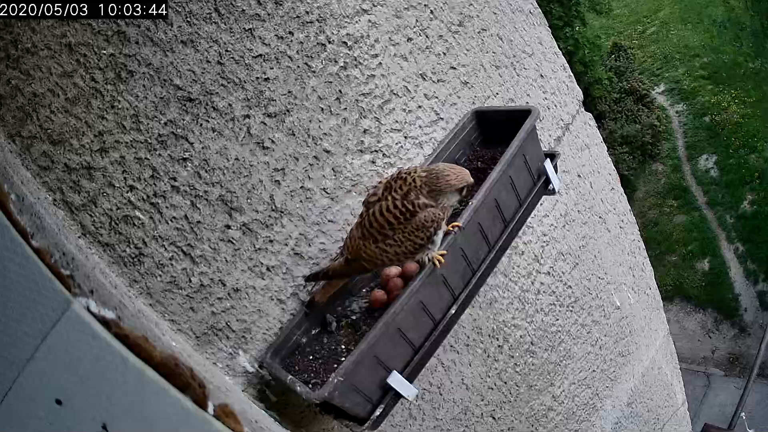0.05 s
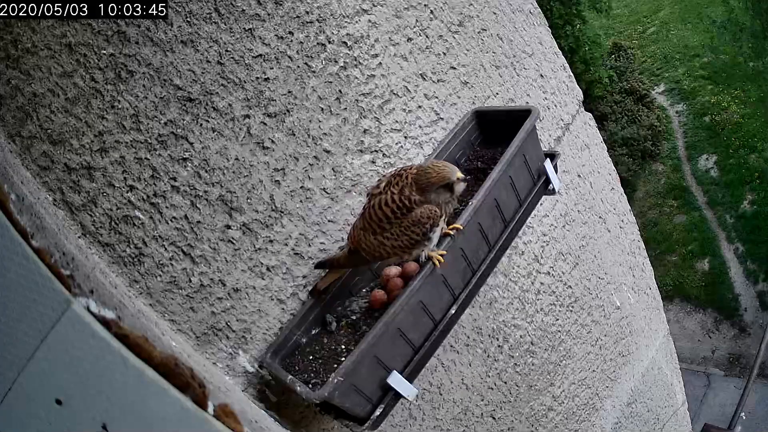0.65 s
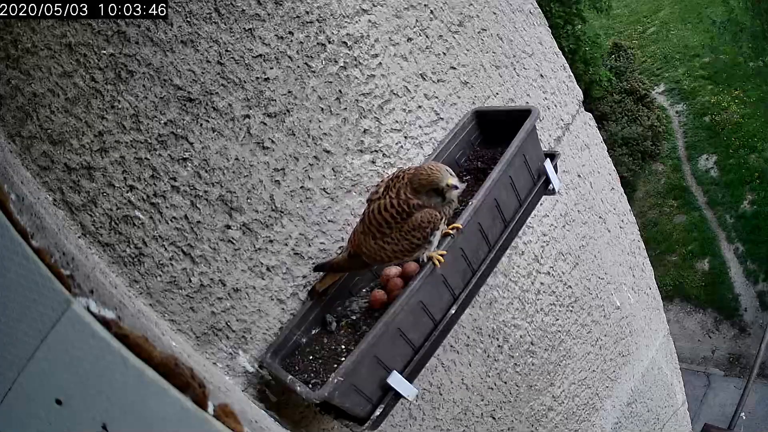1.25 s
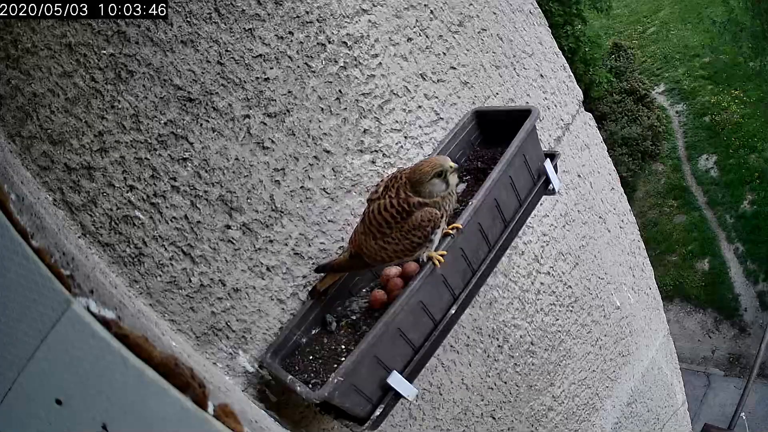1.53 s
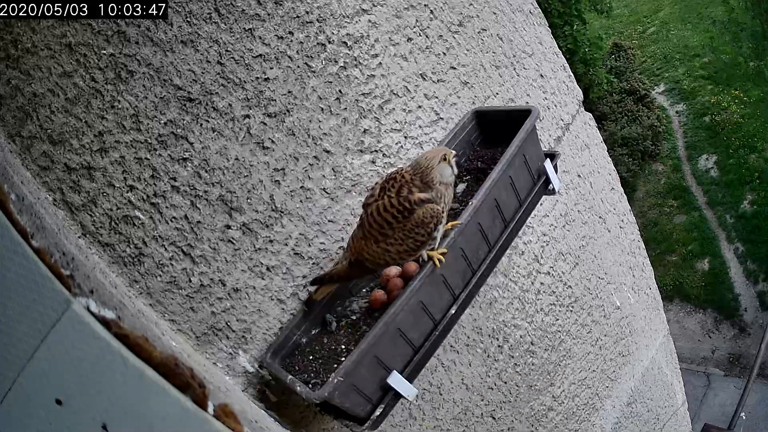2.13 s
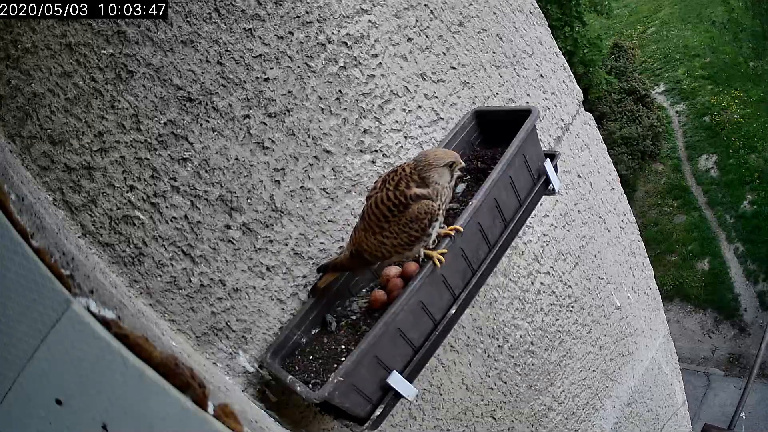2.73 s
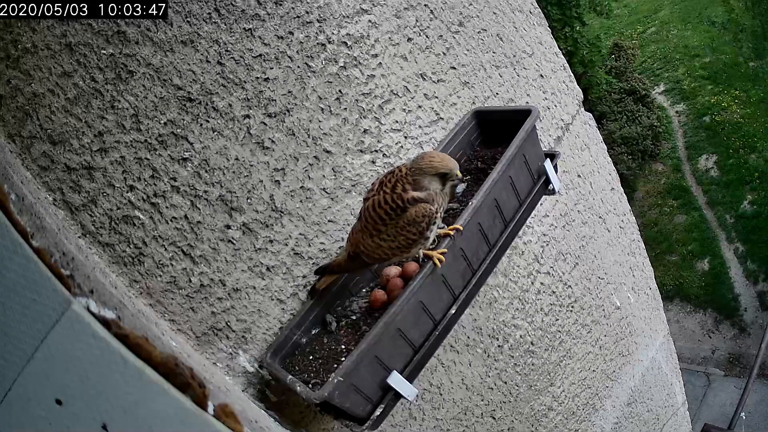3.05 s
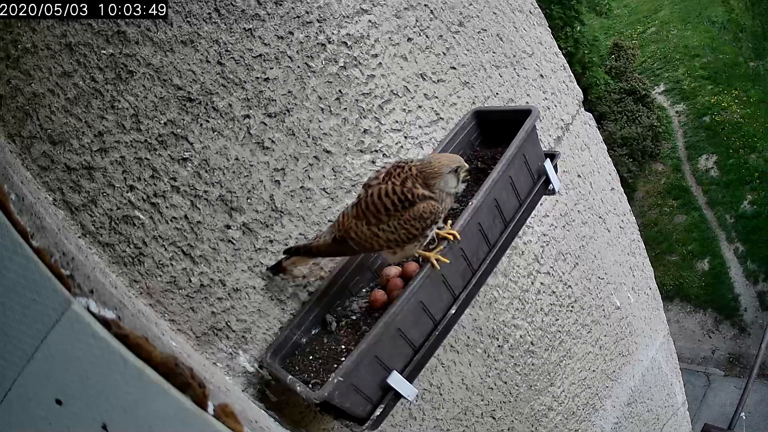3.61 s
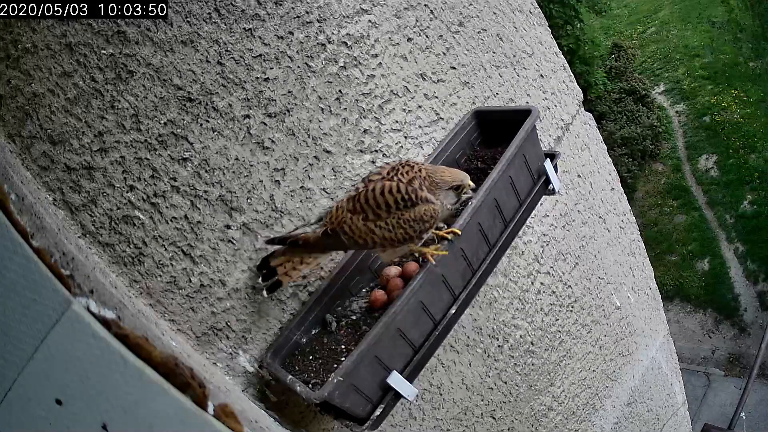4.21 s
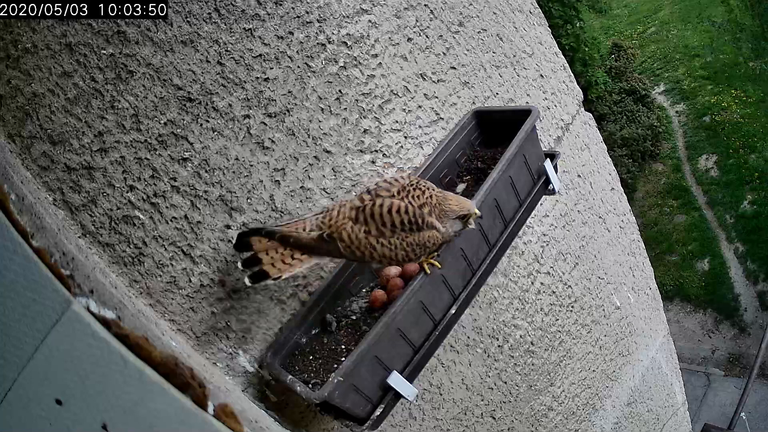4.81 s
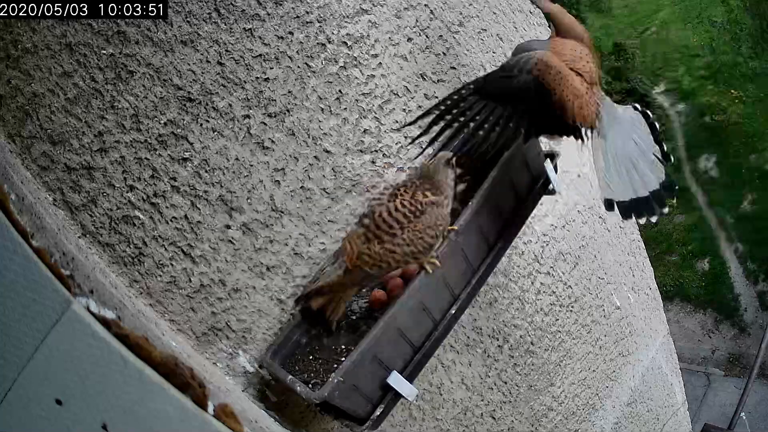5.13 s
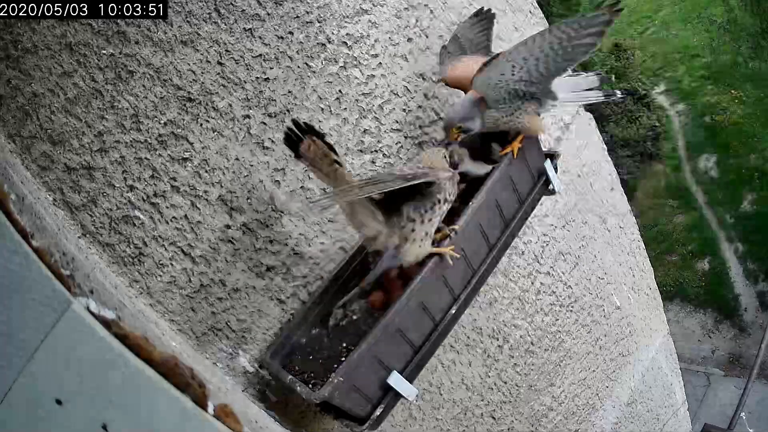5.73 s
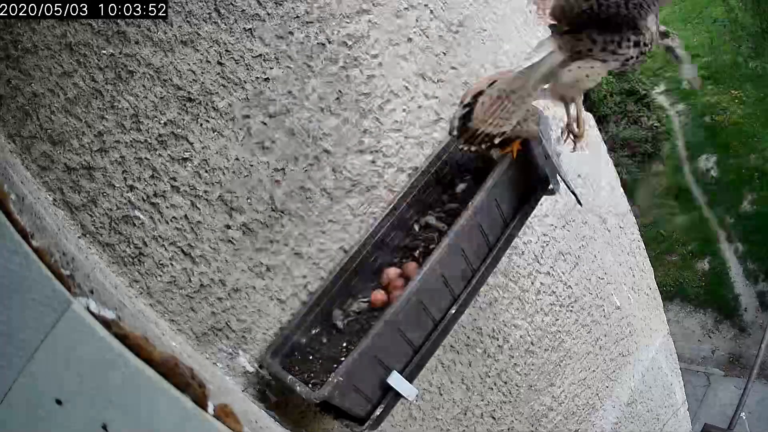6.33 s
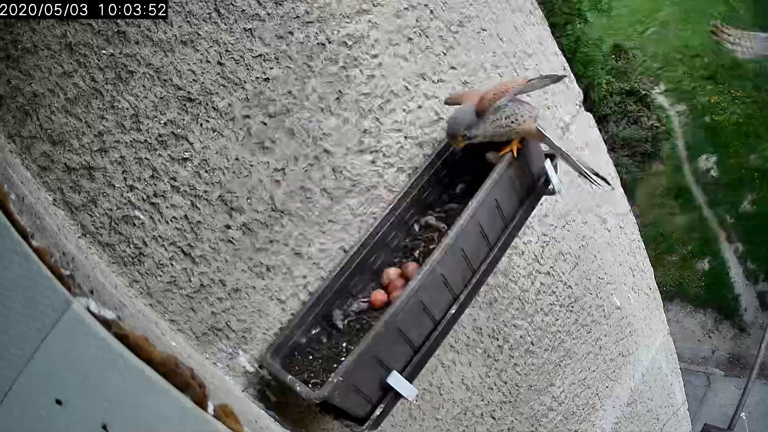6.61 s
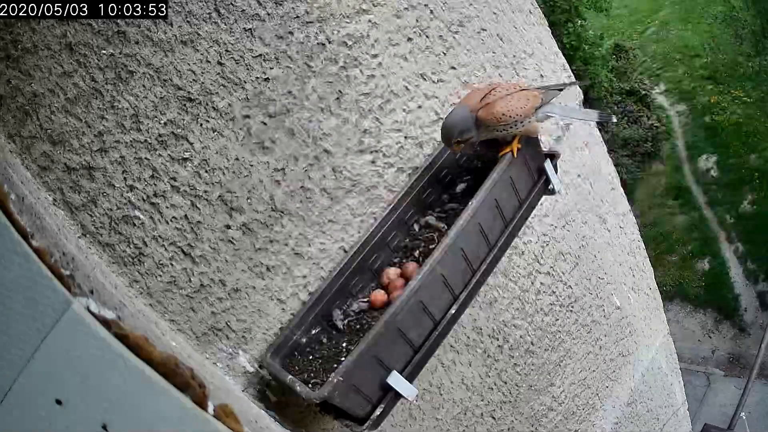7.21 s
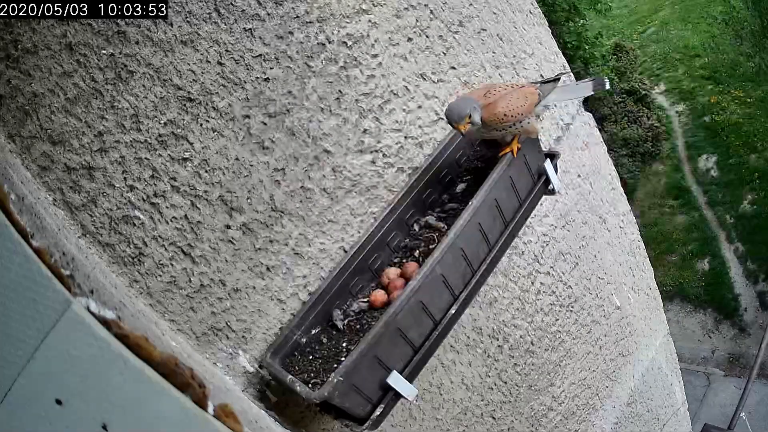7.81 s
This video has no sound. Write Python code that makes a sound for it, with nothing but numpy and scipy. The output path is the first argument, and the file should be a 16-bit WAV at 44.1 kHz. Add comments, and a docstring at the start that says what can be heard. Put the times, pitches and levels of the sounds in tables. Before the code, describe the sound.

Quick rising begging whines from a falcon, followed by bumps on a plastic nest box, thin squeals and chips, with wind and town rumble.

```python
"""A kestrel begs in a plastic window box high on a house wall: rising whines that quaver with
regular pushes of the voice and crack at the end. Her mate lands; feet and wings bump the box,
claws tick on it, and the birds squeal and give sharp chips. Box and wall add a short echo.
Wind and town rumble lie below, with one far bang; a small nest camera samples it all coarsely."""
import sys
import numpy as np
from scipy import signal
from scipy.fft import rfft, irfft, next_fast_len
from scipy.io import wavfile
from scipy.ndimage import map_coordinates

SR = 44100
rng = np.random.default_rng(int(sys.argv[2]) if len(sys.argv) > 2 else 0)


def log_audio(samples):
    """Write samples as a 16-bit WAV file to the path given in sys.argv[1]."""
    # one column per channel
    frames = np.atleast_2d(samples).T
    # limit to full scale, then quantise
    limited = np.clip(frames, -1, 1)
    pcm = np.round(limited * 32767).astype(np.int16)
    wavfile.write(sys.argv[1], SR, pcm)


N = 351036
T = np.arange(N) / SR


def amp(db):
    """Decibels to gain."""
    return 10 ** (np.asarray(db) / 20)


def unit(x):
    """x at rms 1."""
    return x / np.sqrt(np.mean(x ** 2) + 1e-20)


def along(points, hz):
    """(Hz, value) points read on a log axis."""
    freqs, values = np.transpose(points)
    return np.interp(np.log(hz + 1), np.log(freqs + 1), values)


def span(length_s):
    """Sample times of a note, and its progress from 0 to 1."""
    t = T[:max(int(length_s * SR), 64)]
    return t, t / t[-1]


def add(track, start_s, x):
    """Mix x into the track."""
    part = track[round(start_s * SR):][:len(x)]
    part += x[:len(part)]


def fade(t, edge_s):
    """Linear ramps at both ends of a note."""
    return np.clip(np.minimum(t - t[0], t[-1] - t) / edge_s, 0, 1)


def wobble(rate_hz, size=N):
    """Smooth random curve, rate_hz knots a second."""
    knots = rng.standard_normal(int(size * rate_hz / SR) + 4)
    return map_coordinates(knots, [np.arange(size) * rate_hz / SR])


def band(x, lo_hz, hi_hz):
    """Causal band-pass."""
    return signal.sosfilt(signal.butter(2, [lo_hz, hi_hz], "band", fs=SR, output="sos"), x)


def filtered(x, response):
    """Zero-phase filter; response maps Hz to gain."""
    size = next_fast_len(N + SR // 2)
    return irfft(rfft(x, size) * response(np.fft.rfftfreq(size, 1 / SR)), size)[:N]


def noise(spectrum):
    """Noise of rms 1, coloured by (Hz, dB) points."""
    return unit(filtered(rng.standard_normal(N), lambda hz: amp(along(spectrum, hz))))


def tone(hz, partials, jitter, jitter_hz):
    """(multiple, rms dB) partials on one unsteady pitch; jitter is a share of that pitch."""
    unsteady_hz = hz * (1 + jitter * wobble(jitter_hz, len(hz)))
    phase = 2 * np.pi * np.cumsum(unsteady_hz) / SR
    return np.sqrt(2) * sum(amp(db) * np.sin(k * phase) for k, db in partials)


def air():
    """Town rumble and soft wind swell separately; low gusts buffet the microphone."""
    # Swells. Each row: time in seconds, relative rumble level in dB, relative wind level in dB.
    swells = [(0.0, -48, -54), (0.54, -48.5, -56), (0.68, -48, -55.5), (3.3, -52, -59), (3.92, -49, -58.5),
              (4.66, -52, -58.5), (4.78, -45.5, -57), (5.15, -54.5, -58.5), (5.44, -44, -56),
              (6.08, -49, -58.5), (6.26, -46.5, -56.5), (7.4, -48, -58)]
    # Three noise spectra. Each row: frequency in Hz, relative level in dB.
    rumble_spectrum = [(20, -34), (45, -5.5), (70, -6), (95, 3), (125, 1), (175, -2), (215, 3), (250, -3.5),
                       (290, -2), (400, -9), (600, -18), (1500, -56)]
    wind_spectrum = [(100, -19), (500, 0.5), (900, 1), (1050, 3), (1250, 0), (3000, -3), (4500, -6.5),
                     (5600, -7), (5850, -12), (7000, -20.5), (8000, -28)]
    buffet_spectrum = [(20, -10), (50, -3), (95, 9), (140, -12), (300, -53)]
    # Gusts. Each row: start in seconds, length in seconds, level in dB.
    buffets = [(0.06, 0.12, -44.5), (0.154, .06, -42.5), (1.145, 0.034, -43)]
    times_s, rumble_db, wind_db = np.transpose(swells)
    rumble = amp(np.interp(T, times_s, rumble_db) + 1 + 1.7 * wobble(15)) * noise(rumble_spectrum)
    wind = amp(np.interp(T, times_s, wind_db) + 5.5 + 0.48 * wobble(2)) * noise(wind_spectrum)
    for start_s, length_s, db in buffets:
        t, progress = span(length_s)
        gust = unit(noise(buffet_spectrum)[:len(t)])
        add(wind, start_s, amp(db) * np.sin(np.pi * progress) * gust)
    return rumble + wind


def far_bang():
    """A dull bang smeared by the house fronts: soft attack, even decay."""
    # Bang spectrum. Each row: frequency in Hz, relative level in dB.
    spectrum = [(40, -15), (120, -6.5), (170, -2), (215, 1), (320, -4.5), (560, -14), (760, -7.5),
                (830, -14), (920, -4.5), (1020, -14.5), (1300, -9.5), (1600, -27), (2500, -20.5),
                (4000, -63)]
    start_s, attack_s, level_db, fall_db_per_s = 7.448, 0.018, -35.5, 35
    age_s = np.maximum(T - start_s, 0)
    return amp(level_db - fall_db_per_s * age_s) * np.minimum(age_s / attack_s, 1) * noise(spectrum)


def wall_echo(x, early_db, early_t60_s, late_db, late_t60_s):
    """Box and window recess answer at once; the house front adds a weak, longer tail."""
    t = T[:SR // 3]
    response = 0
    for db, t60_s in [(early_db, early_t60_s), (late_db, late_t60_s)]:
        tail = rng.standard_normal(len(t)) * amp(-60 * t / t60_s) * (1 - np.exp(-t / 0.0033))
        response = response + amp(db) * tail / np.linalg.norm(tail)
    return signal.fftconvolve(x, response)[:N]


def box_bumps():
    """Feet and wings knock the soil-filled box: a short ring, a deep thud and a rustle."""
    # Each row: start in seconds, relative level in dB, contact decay in seconds,
    # thud and rustle offsets in dB.
    bumps = [(5.4, -14, 0.0013, -35, -45), (5.409, -30, 0.002, -30, -40), (6.225, -34, 0.017, -11, -2),
             (6.241, -21, 0.0071, -5, -9), (6.25, -27, 0.038, -5, -9)]
    # Box modes. Each row: frequency in Hz, relative level in dB, T60 in seconds.
    modes = [(140, -7, 0.037), (221, -2.5, 0.048), (301, 0, 0.052), (380, -5, 0.0236), (458, -4, 0.0205),
             (720, -11, 0.049)]
    out, t = np.zeros(N), T[:SR // 4]
    for start_s, db, contact_s, thud_db, rustle_db in bumps:
        ring = sum(amp(mode_db + rng.normal(0, 1.7) - 60 * t / t60_s) * np.sin(2 * np.pi * hz * t)
                   for hz, mode_db, t60_s in modes)
        ring = band(ring, 130, 350)  # padded feet give a blunt knock
        thud = amp(thud_db - 60 * t / 0.041) * np.sin(2 * np.pi * 85 * t)
        contact = np.exp(-t / contact_s)
        force = 0.065 * rng.standard_normal(len(t)) * contact
        force[0] = 1  # impact ahead of the scuff
        knock = amp(-7.5) * signal.fftconvolve(ring - thud, force)[:len(t)]
        rustle = amp(rustle_db) * contact * unit(band(rng.standard_normal(len(t)), 97, 430))
        add(out, start_s, amp(db) * (knock + rustle))
    return out


def claw_ticks():
    """Claws tick on the plastic: fast-decaying bursts of noise."""
    # Each row: start in seconds, relative level in dB.
    ticks = [(5.033, -39), (5.388, -36.5), (6.243, -34), (6.615, -38), (7.349, -36)]
    out, t = np.zeros(N), T[:SR // 4]
    for start_s, db in ticks:
        burst = band(rng.standard_normal(len(t)), 910, 3300)
        add(out, start_s, amp(db + 3 - 60 * t / 0.051) * burst)
    return out


def foot_drag():
    """A foot drags on the rim and the wall of the box groans."""
    # Each row: time in seconds, pitch in Hz, relative level in dB.
    contour = [(6.402, 297, -30.5), (6.412, 290, -34.5), (6.428, 281, -29), (6.442, 280, -41),
               (6.49, 281, -43)]
    times_s, pitches_hz, levels_db = np.transpose(contour)
    out, t = np.zeros(N), T[int(times_s[0] * SR):int(times_s[-1] * SR) + 2]
    hz, db = np.interp(t, times_s, pitches_hz), np.interp(t, times_s, levels_db)
    groan = tone(hz, [(1, db), (2, db - 19.5)], jitter=0.055, jitter_hz=220)
    add(out, t[0], fade(t, 0.0023) * groan)
    return out


def rasp(length_s, hz, db):
    """The voice loses its clear pitch and rasps round hz, its second harmonic."""
    t, _ = span(length_s)
    flutter = amp(1.5 * wobble(580, len(t)))
    voice = tone(np.full(len(t), hz), [(1, 0)], jitter=0.038, jitter_hz=750)
    return amp(db) * fade(t, 0.0014) * flutter * voice


def lone_rasps():
    """Short hoarse catches of the voice, apart from those that open the whines."""
    # Each row: start in seconds, length in seconds, frequency in Hz, level in dB.
    notes = [(0.629, 0.072, 2523, -55), (0.692, 0.018, 2782, -50), (6.033, 0.0098, 3040, -52),
             (7.044, 0.022, 3240, -50), (7.061, .046, 3192, -57)]
    out = np.zeros(N)
    for start_s, length_s, hz, db in notes:
        add(out, start_s, rasp(length_s, hz, db))
    return out


def squeals():
    """Thin arched notes carried by the third harmonic; its neighbours are faint."""
    # Each row: start, length and attack in seconds, third harmonic in Hz at the start,
    # middle and end, level in dB.
    notes = [(5.861, 0.072, 0.043, 4880, 5274, 5280, -37), (5.932, 0.054, 0.037, 5110, 5270, 5610, -33),
             (5.997, 0.045, .003, 5250, 5415, 4900, -36.5), (6.327, .052, 0.011, 5640, 5760, 5380, -50.5),
             (6.433, 0.039, 0.0099, 5760, 5540, 5200, -40), (6.711, 0.05, .006, 6130, 6060, 6060, -53),
             (6.752, 0.023, .003, 5400, 5700, 5470, -38)]
    out = np.zeros(N)
    for start_s, length_s, attack_s, start_hz, middle_hz, end_hz, top_db in notes:
        t, progress = span(length_s)
        arch_hz = (middle_hz - (start_hz + end_hz) / 2) * (1 - (2 * progress - 1) ** 2)
        third_hz = start_hz + (end_hz - start_hz) * progress + arch_hz
        db = top_db - 12 * progress ** 4
        voice = tone(third_hz / 3, [(2, db - 50), (3, db), (4, db - 54)], jitter=0.01, jitter_hz=560)
        add(out, start_s, np.minimum(t / attack_s, 1) * fade(t, 0.0019) * voice)
    return out


def chips():
    """Brief hoarse notes whose weight flips from the third harmonic towards the second."""
    # Each row: start, length and flip delay in seconds, opening and closing pitch in Hz,
    # third harmonic before the flip, second after it and fall of the third in dB,
    # accent delay in seconds, accent gain in dB, fundamental in dB.
    notes = [(4.570, 0.02, 0.0065, 1812, 1775, -31.5, -33.5, -1, 0.0069, 2.5, -48),
             (5.277, 0.015, 0.0013, 1750, 1683, -34, -45, 4.5, 0.0016, 4.5, -51.5),
             (5.482, 0.024, 0.004, 1950, 1832, -37, -28, 13, 0.013, 5, -74),
             (6.21, 0.015, 0.0044, 1795, 1682, -22.5, -41, -3.5, .004, -0.5, -51),
             (6.636, 0.027, 0.0068, 1968, 2156, -21.5, -21, 21, 0.0048, 8, -60),
             (7.3747, 0.021, 0.0038, 1814, 2066, -21, -23, 11.5, .0098, 12.5, -44.5)]
    flip_width_s, second_rise_db = 0.0002, 20
    accent_attack_s, accent_decay_s, release_s = 0.0008, 0.0033, 0.0045
    out = np.zeros(N)
    for (start_s, length_s, flip_s, open_hz, close_hz, third_db, second_db, fall_db,
         accent_s, accent_gain_db, first_db) in notes:
        t, _ = span(length_s)
        flip = (1 + np.tanh((t - flip_s) / flip_width_s)) / 2
        accent_width_s = np.where(t < accent_s, accent_attack_s, accent_decay_s)
        accent_db = accent_gain_db * np.exp(-((t - accent_s) / accent_width_s) ** 2)
        envelope_db = accent_db - 10 * np.exp(-((t[-1] - t) / release_s) ** 2)
        hz = (open_hz + (close_hz - open_hz) * flip) * (1 + 0.021 * wobble(264, len(t)))
        h1_db = first_db + envelope_db + 0.85 * accent_db
        h2_db = second_db + envelope_db - second_rise_db * (1 - flip)
        h3_db = third_db + envelope_db - fall_db * flip
        h4_db = h2_db - np.interp(hz, [1850, 2000], [17, 30])
        jitter = np.interp(hz, [1800, 2100], [0.007, 0.024])  # higher notes are rougher
        flutter = amp(np.interp(hz, [1800, 2100], [0.6, 1.6]) * wobble(1540, len(t)))
        hiss = amp(h1_db - 4.5) * unit(band(rng.standard_normal(len(t)), 2650, 3900))
        voice = tone(hz, [(1, h1_db), (2, h2_db), (3, h3_db), (4, h4_db)], jitter, jitter_hz=1590)
        add(out, start_s, fade(t, 0.0015) * (hiss + flutter * voice))
    return out


def whines():
    """Each whine glides up, swells and brightens; pushes lift pitch and level until it cracks down."""
    # Each row: start and end in seconds, start and end pitch in Hz, glide exponent (under 1 rises
    # early), times of the voice opening and of the last push in seconds, pushes per second, quaver as
    # a share of pitch, base level in dB, tilt in dB per harmonic, rasp level in dB, crack depth 0-1.
    calls = [(0, .077, 1306, 1400, .5, .1, .044, 16.4, .02, -54.5, -1, -70, .05),
             (.08, .47, 1283, 1691, 1.15, .35, .429, 16.3, .057, -51.3, -1.6, -68, .95),
             (.64, .985, 1259, 1587, 1, .925, .944, 15.7, .053, -52.3, -3.8, -58, .85),
             (1.128, 1.458, 1359, 1660, 1, 1.335, 1.412, 16.1, .053, -51, -3, -53, .9),
             (1.585, 1.963, 1385, 1750, .66, 1.715, 1.912, 16.4, .06, -52.6, -2.4, -49, .9),
             (2.231, 2.519, 1535, 1716, 2.3, 2.33, 2.466, 16.7, .066, -52.5, .6, -57, .7),
             (2.656, 2.968, 1625, 1840, .68, 2.72, 2.925, 15.9, .056, -49.8, -.6, -52, .8),
             (3.088, 3.475, 1693, 1887, 1.2, 3.195, 3.433, 16.1, .05, -49.5, 2.5, -47.5, .9),
             (3.596, 4.027, 1640, 1755, 6.7, 3.84, 3.986, 16.4, .082, -50.3, 0, -41.5, .9),
             (4.154, 4.524, 1503, 1714, .4, 4.34, 4.49, 16.7, .057, -49.3, .2, -50, .25),
             (4.695, 4.763, 1630, 1665, 1, 4.8, 4.785, 16.4, .01, -53.7, -1, -42.5, .1),
             (4.927, 5.153, 1600, 1782, .89, 4.955, 5.119, 20.2, .05, -49, -1.3, -66, .1)]
    # Effort on harmonics 1-3. Each row: gain in dB over the call, on opening, in a push, when slack.
    effort_gains = [(4, -1, 2, -6.5), (1.5, 3, 5.5, 9.5), (5, 4.5, 7.5, 4.5)]
    # Throat resonances. Each row: frequency in Hz, gain in dB.
    throat = [(1300, -3), (1500, -3), (1700, 5), (1800, 5.5), (1950, -3), (2600, -10), (3000, 0.6),
              (3350, -1), (3600, -5), (3900, -8), (4300, -12), (4700, -9.5), (5050, -2.5), (5500, -3.7),
              (5900, -6.5)]
    open_s, slack_s, rasp_s, squeeze_s = 0.012, 0.0071, 0.014, 0.054
    scoop_share, scoop_s = 0.048, 0.0063  # each whine starts flat
    crack_share, crack_s = 0.13, 0.008
    clear_hz, strain_hz = 1570, 1750  # the voice roughens below and above this range
    out = np.zeros(N)
    for (start_s, end_s, start_hz, end_hz, bend, opens_at_s, last_push_s, push_hz, quaver,
         db, tilt_db, rasp_db, crack_depth) in calls:
        t, effort = span(end_s - start_s)
        left_s = t[-1] - t
        opened = (1 + np.tanh((start_s + t - opens_at_s) / open_s)) / 2
        pulses = np.abs(np.cos(np.pi * push_hz * (start_s + t - last_push_s))) ** 2.1
        push = (effort + opened * (1 - effort)) * pulses
        crack = crack_depth * np.exp(-(left_s / crack_s) ** 2)
        slack = np.exp(-t / slack_s) + np.exp(-left_s / slack_s)
        glide_hz = start_hz + (end_hz - start_hz) * effort ** bend
        scoop = scoop_share * np.exp(-t / scoop_s)
        hz = glide_hz * (1 + quaver * push) * (1 - scoop - crack_share * crack)

        partials = []
        for k, (swell_db, open_db, push_db, slack_db) in enumerate(effort_gains, 1):
            base_db = db + along(throat, k * hz) + (k - 2) * tilt_db
            effort_db = swell_db * effort + open_db * opened + push_db * push + slack_db * slack
            crack_db = 2 * crack if k == 2 else 0
            partials.append((k, base_db + effort_db + crack_db))
        strain = np.clip((hz - strain_hz) / 200, 0, 1)
        third_db = partials[-1][1]
        partials.append((4, third_db - 21 - 9 * strain))

        hoarse = np.clip((clear_hz - glide_hz) / 200, 0, 1)
        jitter = 0.006 + 0.0066 * hoarse + push * (0.003 + 0.005 * strain) + 0.015 * crack
        flutter = amp(1.1 * wobble(190, len(t)))
        squeeze = amp(2 * crack_depth * np.exp(-(left_s / squeeze_s) ** 2))  # swell into the crack
        voice = tone(hz, partials, jitter, jitter_hz=520)
        add(out, start_s, fade(t, 0.0025) * squeeze * flutter * voice)
        add(out, start_s - rasp_s / 2, rasp(rasp_s, 2 * start_hz * (1 - scoop_share / 2), rasp_db))
    return out


def scene():
    """Birds and box against the wall, over the open air."""
    birds = whines() + lone_rasps() + chips() + squeals()
    box = box_bumps() + claw_ticks() + foot_drag()
    echo_send = birds + amp(-1.5) * box
    echo = wall_echo(echo_send, early_db=-7.5, early_t60_s=0.07, late_db=-15, late_t60_s=0.16)
    return (birds + box + echo + far_bang() + air())[None]


def record(dry):
    """The camera joins coarse samples by straight lines, which mirrors the calls into the treble."""
    camera_hz, top_hz, ceiling = 16000, 15850, 0.7

    def anti_alias(hz):
        """Cut at half the camera rate; lift the treble that the straight lines will dull."""
        droop = np.sinc(np.minimum(hz / camera_hz, 0.5)) ** 2
        return np.clip((camera_hz / 2 - hz) / 120, 0, 1) / droop

    limited = dry[0] / (1 + (dry[0] / ceiling) ** 6) ** (1 / 6)
    sample_times_s = np.arange(int(N * camera_hz / SR)) / camera_hz
    samples = map_coordinates(filtered(limited, anti_alias), [sample_times_s * SR])
    joined = np.interp(T, sample_times_s, samples)
    return filtered(joined, lambda hz: hz < top_hz)[None]


dry = scene()
out = record(dry)
log_audio(out)
```